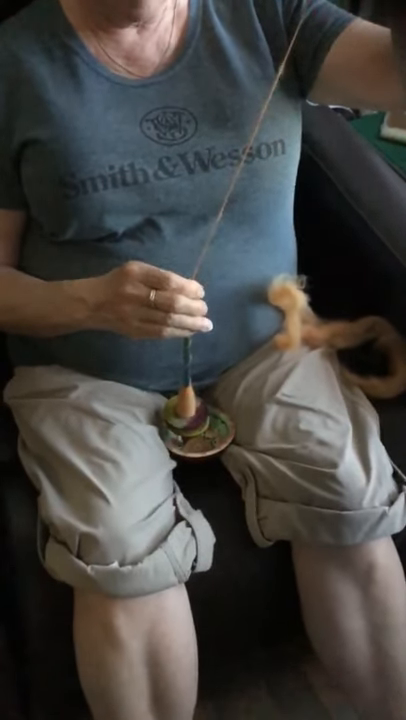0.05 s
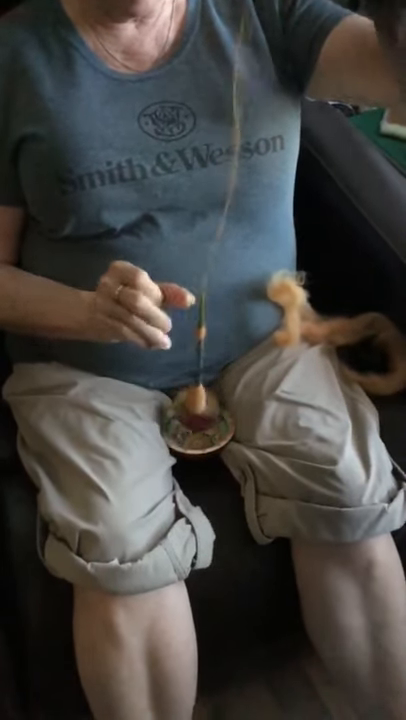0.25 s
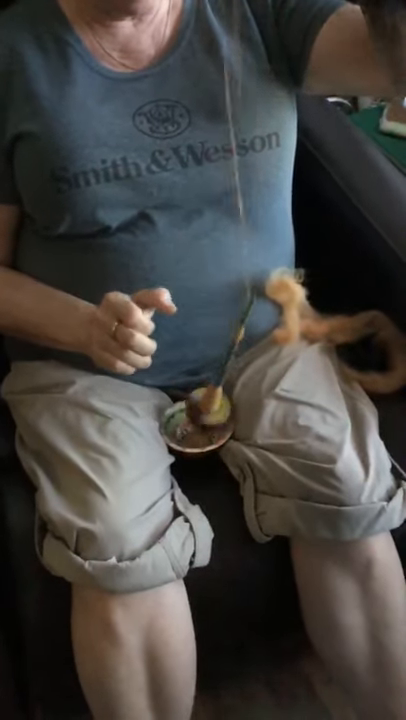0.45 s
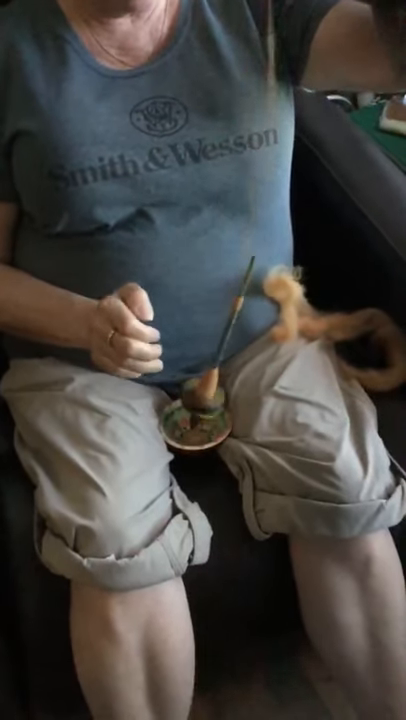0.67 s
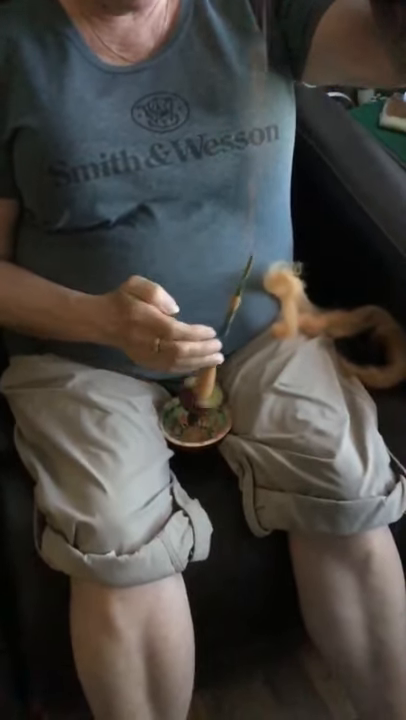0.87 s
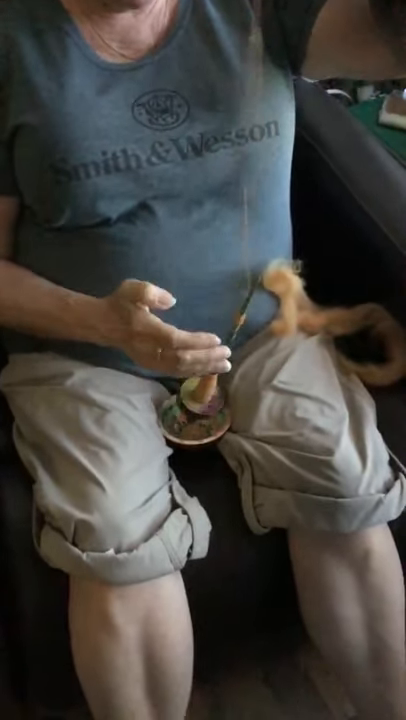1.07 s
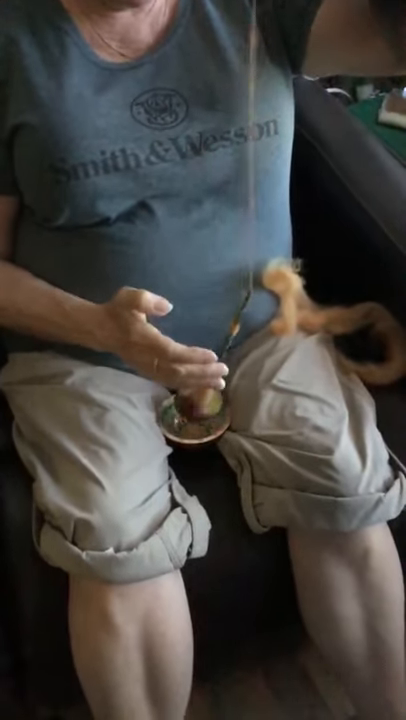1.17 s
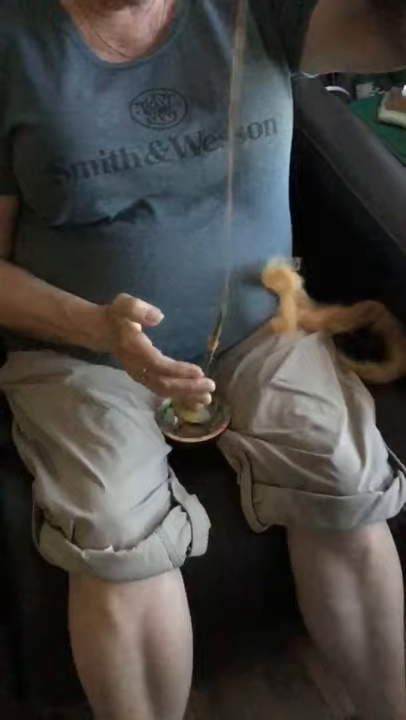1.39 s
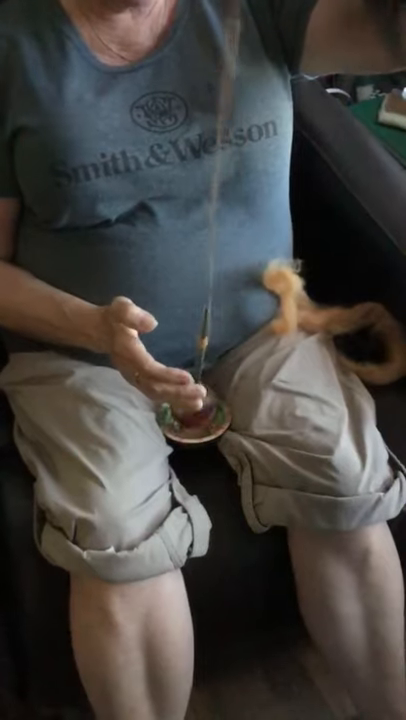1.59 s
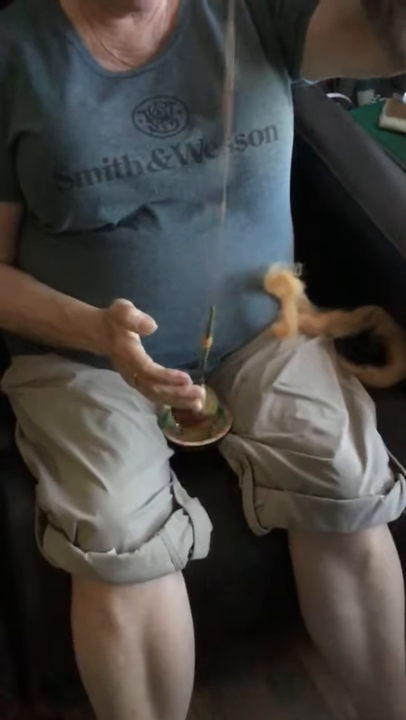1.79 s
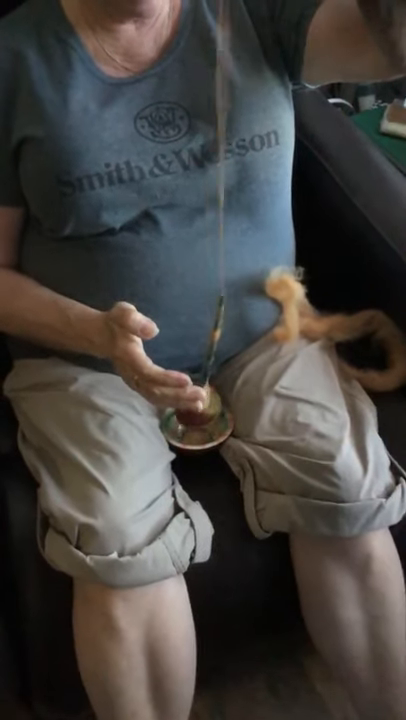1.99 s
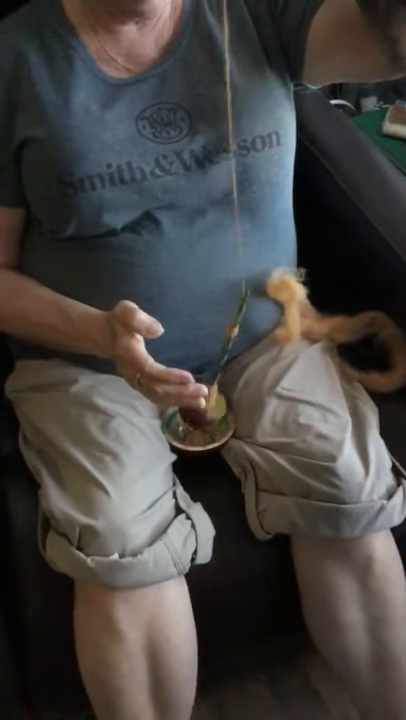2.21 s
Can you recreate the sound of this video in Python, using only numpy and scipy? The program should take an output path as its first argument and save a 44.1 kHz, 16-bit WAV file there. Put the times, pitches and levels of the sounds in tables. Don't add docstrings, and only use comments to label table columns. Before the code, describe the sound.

A wooden spindle spins in a small dish with a rough, rattling scrape that dies away

```python
import sys
import numpy as np
from scipy import signal
from scipy.fft import rfft, irfft, next_fast_len
from scipy.io import wavfile
from scipy.ndimage import uniform_filter1d, map_coordinates

SR = 44100
rng = np.random.default_rng(int(sys.argv[2]) if len(sys.argv) > 2 else 0)


def how_loud(loudness_db):
    steps = np.asarray(loudness_db, float) / 20
    return 10 ** steps


def unload_audio(sound):
    columns = np.transpose(np.atleast_2d(sound))
    steps = np.round(np.clip(columns, -1, 1) * 32767)
    wavfile.write(sys.argv[1], SR, steps.astype(np.int16))


N = 99225

# [t/s, peak level/dB, click f/Hz, spray level/dB]
HOPS = [(0.2314, -51.5, 5530, -12), (0.241, -63, 5590, -3), (0.2544, -37, 5300, 12),
        (0.2691, -32.5, 6470, 2), (0.2984, -33, 6300, 3), (0.312, -32, 6460, 17), (0.3575, -34, 6950, -11),
        (0.375, -31, 6140, -22), (0.4199, -28.5, 6340, -6), (0.4394, -30.5, 5500, 10),
        (0.4722, -31.5, 5150, -11), (0.4807, -36, 7140, -11), (0.5013, -36, 6900, -11),
        (0.5234, -44, 5580, 3), (0.53, -37.5, 5560, -8), (0.5483, -48, 4500, -6), (0.5475, -30, 5330, -11),
        (0.566, -30.5, 6640, -6), (0.5998, -39, 6160, -4), (0.6132, -54, 6730, -6), (0.6264, -55, 4890, -9),
        (0.6584, -70, 5450, -6), (0.675, -62, 6170, -6), (0.679, -58, 5400, -6), (0.6957, -44, 5970, -2),
        (0.7185, -33, 6050, 12), (0.7732, -39, 5400, 3), (0.8014, -45, 4540, -4),
        (0.8004, -34.5, 5440, -12), (0.8276, -42, 5230, -10), (0.8333, -29, 5700, -26),
        (0.899, -55, 5540, -6), (0.9611, -35.5, 6000, 8), (0.9943, -40, 6500, -1), (1.0462, -50, 6150, -6),
        (1.0518, -54, 5500, -18.5), (1.0639, -40, 5530, -8), (1.1047, -49, 5860, -10),
        (1.1117, -50, 5440, -6), (1.167, -39, 5800, -18), (1.2688, -57, 5470, -6),
        (1.3821, -45.5, 5540, -11)]
# [t/s, peak level/dB, f/Hz, contact t/s]
ROCKS = [(1.051, -38, 1170, 0.0095), (1.105, -35.5, 1123, 0.011), (1.169, -38.5, 805, 0.015),
         (1.236, -40, 1220, 0.0062), (1.271, -35.5, 805, 0.0078), (1.306, -44, 1075, 0.013),
         (1.369, -44.5, 1160, 0.0081), (1.383, -49.5, 1190, 0.0023), (1.04, -50, 2440, 0.011),
         (1.27, -53, 2320, 0.0052), (1.45, -49, 1360, 0.011), (1.474, -52.5, 1286, 0.006),
         (1.581, -45, 1090, 0.0028), (1.665, -48, 1190, 0.0028), (1.732, -53.5, 815, 0.011),
         (1.838, -51, 847, 0.0071), (1.948, -65, 635, 0.012), (2.025, -55, 885, 0.008),
         (2.153, -67, 674, 0.011), (2.211, -62, 890, 0.011)]
# [t/s, peak level/dB, f/Hz, contact t/s]
FLICKS = [
    (0.214, -47.5, 1580, 0.0089),
    (0.2251, -43.5, 1716, 0.015),
    (0.236, -42.5, 1448, 0.034),
    (1.4491, -58.5, 1714, 0.026),
]
# [f/Hz, width f/Hz, level/dB]
SHAFT_MODES = [(590, 34, -6.5), (673, 42, -6), (788.5, 24, -2.5), (932, 52, -7.5), (1068, 42.5, -1),
               (1190, 64, 1.5), (1309, 46.6, 1), (1426, 34.4, 0), (1580, 255, -7), (1876, 154, -9.5),
               (2328, 280, -13)]
# [f/Hz, width f/Hz, level/dB]
DISH_MODES = [(3270, 186, 6.5), (3594, 290, 0), (3892, 73, 5.5), (5440, 430, -6), (6500, 300, -3.5),
              (6950, 100, -6), (8380, 190, -11), (10180, 260, -16.5), (12400, 380, -11.5),
              (14400, 1800, -20)]
# [f/Hz, width f/Hz, level/dB]
BOWL_MODES = [(805, 58, -2.5), (1106, 80, -3), (1213.3, 56, 2), (1643, 36, -12)]
# [t/s, level/dB, upper modes over lower level/dB]
PRESSURE = [(0.226, -63.5, 5), (0.253, -42, 7.5), (0.309, -39.5, 2.5), (0.325, -35, 4), (0.414, -48, -3),
            (0.421, -39, 0), (0.463, -46.5, 0.5), (0.609, -40.5, 3.5), (0.753, -46, 2), (0.866, -41, 4),
            (1.001, -48.5, 6.5), (1.015, -45, 14), (1.267, -50, 10), (1.272, -60.5, 31), (1.359, -57.5, -6),
            (1.385, -46.5, 6), (1.427, -80, 4), (1.451, -61, 16)]
# [t/s, level/dB]
SLIDING = [(.21, -94), (0.242, -66.5), (.3, -52), (.4, -63), (.45, -65.5), (.58, -54), (.65, -65.5),
           (.74, -57), (.8, -54.5), (.87, -64), (.93, -69.5), (.97, -73), (1.06, -64.5), (1.14, -65.5),
           (1.2, -94), (1.27, -74), (1.35, -83), (1.45, -85)]
# [t/s, level/dB, half length t/s]
LIFTS = [
    (0.405, -2.5, .008),
    (0.472, 2, .005),
    (0.557, -5, .004),
    (0.76, -5.5, 0.0052),
    (.795, 0, 0.0044),
    (1.229, -16, 0.0067),
    (1.3, -6, .008),
    (1.35, -7, .012),
]
# [t/s, peak level/dB, contact t/s]
SCRAPES = [(0.227, -60, 0.011), (0.2433, -47, 0.0035), (0.254, -36, 0.0039), (0.2735, -34, 0.01),
           (0.294, -33, 0.0095), (0.347, -42, 0.006), (0.3565, -42, 0.006), (0.3745, -36.5, 0.0046),
           (0.4172, -55, 0.0073), (0.4385, -33, 0.006), (0.4746, -35.5, 0.0089), (0.5237, -52, 0.0048),
           (0.5465, -26, 0.004), (0.5673, -31, 0.0037), (0.6, -36, 0.0081), (0.617, -36.5, 0.0094),
           (0.6823, -38, 0.0042), (0.7173, -35, 0.0053), (0.7535, -46, 0.011), (0.7757, -31, 0.006),
           (0.8, -33, 0.0045), (0.832, -40, 0.0085), (0.8494, -31, 0.0063), (0.8754, -37, 0.005),
           (0.917, -46, 0.0055), (0.952, -46, 0.0038), (0.99, -47, 0.0052), (1.054, -42, 0.006),
           (1.109, -42, 0.0037), (1.1667, -53, 0.006), (1.179, -46, 0.0049), (1.2335, -68, 0.0053),
           (1.262, -49.5, 0.0065), (1.312, -50.5, 0.0052), (1.3657, -70, 0.0034), (1.3836, -42, 0.0036),
           (1.4111, -75, 0.0041)]
# [f/Hz, level/dB, wander rate/(1/s)]
SINGING_MODES = [(3285, -1.5, 110), (3403, -4, 140), (3896, -16.5, 40)]
# [t/s, peak level/dB]
JOLTS = [(0.24, -39.5), (0.256, -33), (0.273, -24), (0.323, -27), (0.42, -33), (0.473, -29), (0.72, -37),
         (0.775, -35), (0.8, -33), (0.845, -27), (0.864, -23), (0.947, -44), (1.012, -42)]
# [f/Hz, level/dB per Hz]
ROOM_AIR = [(50, -34), (85, -5), (266, -7.5), (301, -4.5), (419, -16.5), (979, -18), (1420, -21),
            (12000, -34), (15600, -29), (22000, -120)]
# [f/Hz, T60 t/s]
WALL_DECAY = [(500, 0.35), (3000, 0.22), (10000, 0.33)]
# [f/Hz, level/dB]
MICROPHONE = [(20, -42), (45, -2), (70, 0), (11500, -0.5), (13000, -13), (15800, -9)]

GRIT_PER_S, GRIT_SPREAD_DB, GRIT_HISS, GRIT_TOP_DB = 900, 3, 0.92, 11
SLIDE_PER_S, SLIDE_SPREAD_DB, SLIDE_HISS = 420, 3.6, 0.22
PRESS_DB, SLIDE_DB, WOBBLE_DB, SING_DB = -3.5, 2.5, 5.5, -3.5
STEADY_S = 0.027
SETTLE_S, SETTLE_OVER_S, BOWL_EARLY_DB, BOWL_LATE_DB = 0.867, 0.14, -20, 5
FLIGHT_S, FLIGHT_DB, LANDED_S, LANDED_DB, BITE_TOP_DB = 0.0027, -1, 0.0047, 6, 7
ROCK_RISE_S, ROCK_T60_S, ROCK_DB, ROCK_SCUFF_DB = 0.002, 0.035, -8, -5
SCRAPE_RISE_S, SCRAPE_T60_S, SCRAPE_DB = 0.00067, 0.026, -8.5
CLICK_RISE_S, CLICK_T60_S, CLICK_WIDTH_HZ, CLICK_DB = 0.0009, 0.012, 1000, -3
CRACK_DB, RING_DB, KNOCK_DB, CHATTER_S = -24, -7.5, -9, 0.0006
AIR_DB, WALLS_DB, LOW_CUT_HZ = -62.5, -6.5, 395
DRONE_HZ, DRONE_SWAY_DB, DRONE_DB = 68, 1.3, -68
HUM_HZ, HUM_FROM_S, HUM_RISE_S, HUM_DB = 304, 2.14, 0.09, -60
BRUSH_S, BRUSH_T60_S, BRUSH_DB, BRUSH_HZ, BRUSH_WIDTH_HZ = 2.147, 0.17, -67, 4660, 2800


def unit(x):
    return x / np.sqrt(np.mean(x ** 2) + 1e-20)


def along(points, hz):
    f, value = np.transpose(points)
    return np.interp(np.log(hz + 1), np.log(f + 1), value)


def wobble(rate):
    knots = rng.standard_normal(int(N * rate / SR) + 4)
    return map_coordinates(knots, [np.arange(N) * rate / SR])


def filtered(x, response):
    m = next_fast_len(N + SR // 2)
    return irfft(rfft(x, m) * response(np.fft.rfftfreq(m, 1 / SR)), m)[..., :N]


def body(x, modes):
    def response(f):
        return sum((-1) ** k * how_loud(db) * 1j * f * width / (hz * hz - f * f + 1j * f * width)
                   for k, (hz, width, db) in enumerate(modes))
    return filtered(x, response)


def steep(x, hz, width):
    mode = [(hz, width, 0)]
    return body(body(x, mode), mode)


def steady(x):
    power = np.abs(uniform_filter1d(x ** 2, round(STEADY_S * SR)))
    return x / np.sqrt(power + 1e-12)


def contact_shape(t, db, hold, rise, t60):
    return how_loud(db - 60 * np.clip(t - hold, 0, 1) / t60) * (1 - np.exp(-t / rise))


def room():
    t = np.arange(N) / SR
    spectrum = [(20, 3), (70, -17.5)] + list(ROOM_AIR[1:-2])
    air = unit(filtered(rng.standard_normal(N), lambda f: how_loud(along(spectrum, f))))
    air = air * how_loud(AIR_DB + 0.41 * wobble(6.2))
    drone = np.sqrt(2) * np.sin(2 * np.pi * DRONE_HZ * t + 0.38 * wobble(7.7))
    drone = drone * how_loud(DRONE_DB + DRONE_SWAY_DB * wobble(9.7))
    hum_rise = np.clip((t - HUM_FROM_S) / HUM_RISE_S, 0, 1)
    hum = how_loud(HUM_DB) * hum_rise * np.sin(2 * np.pi * HUM_HZ * t)
    after = np.clip(t - BRUSH_S, 0, 1)
    brush = unit(steep(rng.standard_normal(N), BRUSH_HZ, BRUSH_WIDTH_HZ))
    brush = brush * contact_shape(after, BRUSH_DB, 0, 0.002, BRUSH_T60_S)
    return air + drone + hum + brush


def grit(per_s, spread_db, hiss):
    chance, size_draw, sign_draw = rng.random((3, N))
    size_db = np.minimum(-spread_db * np.log(size_draw + 1e-9), GRIT_TOP_DB)
    impacts = how_loud(size_db) * np.sign(sign_draw - 0.5) * (chance < per_s / SR)
    return unit(impacts) + hiss * rng.standard_normal(N)


def bowl(x):
    return sum(how_loud(db) * steep(x, hz, width) for hz, width, db in BOWL_MODES)


def contact_db():
    since = np.arange(N) / SR - np.transpose(HOPS)[0][:, None]
    before = FLIGHT_DB * (since < 0) * np.exp(np.clip(since, -1, 0) / FLIGHT_S)
    after = LANDED_DB * (since >= 0) * np.exp(-np.clip(since, 0, 1) / LANDED_S)
    return np.minimum((before + after).sum(axis=0), BITE_TOP_DB)


def lift_db():
    t = np.arange(N) / SR
    return sum(db * np.exp(-((t - s) / half) ** 2) for s, db, half in LIFTS)


def grinding():
    t = np.arange(N) / SR
    s, press_db, upper_db = np.transpose(PRESSURE)
    rub = grit(GRIT_PER_S, GRIT_SPREAD_DB, GRIT_HISS)
    lower = body(rub, SHAFT_MODES[:6])
    upper = how_loud(np.interp(t, s, upper_db)) * body(rub, SHAFT_MODES[6:])
    settled_db = np.interp(t, [SETTLE_S, SETTLE_S + SETTLE_OVER_S], [BOWL_EARLY_DB, BOWL_LATE_DB])
    shaft = steady(unit(lower + upper) + how_loud(settled_db) * unit(bowl(rub)))
    bite_db = contact_db()
    shaft = shaft * how_loud(np.interp(t, s, press_db, -120, -120) + PRESS_DB + 0.5 * bite_db)

    s, slide_db = np.transpose(SLIDING)
    slide_db = np.interp(t, s, slide_db, -120, -120) + SLIDE_DB
    slide = how_loud(slide_db + bite_db + WOBBLE_DB * wobble(43.83))
    ticks = grit(SLIDE_PER_S, SLIDE_SPREAD_DB, SLIDE_HISS)
    dish = body(ticks * slide, DISH_MODES) / np.std(body(ticks, DISH_MODES))
    sing = how_loud(SING_DB) * steady(body(rng.standard_normal(N), DISH_MODES[:3]))
    return how_loud(lift_db()) * (shaft + dish + sing * slide)


def rocks():
    tone, scuff, t = np.zeros(N + SR), np.zeros(N + SR), np.arange(5000) / SR
    for s, db, hz, hold in list(FLICKS) + list(ROCKS):
        start = round(s * SR)
        shape = contact_shape(t, db + ROCK_DB, hold, ROCK_RISE_S, ROCK_T60_S)
        phase_drift = 0.39 * np.cumsum(rng.standard_normal(5000)) / 20
        tone[start:][:5000] += shape * np.sin(2 * np.pi * hz * t + phase_drift)
        scuff[start:][:5000] += shape
    rub = uniform_filter1d(rng.standard_normal(N), size=12)
    scuffing = body(rub * scuff[:N], SHAFT_MODES) / np.std(body(rub, SHAFT_MODES))
    return tone[:N] + how_loud(ROCK_SCUFF_DB) * scuffing


def scrapes():
    drag, t = np.zeros(N + SR), np.arange(5000) / SR
    for s, db, hold in SCRAPES:
        shape = contact_shape(t, db + SCRAPE_DB, hold, SCRAPE_RISE_S, SCRAPE_T60_S)
        drag[round(s * SR):][:5000] += shape
    t, singing = np.arange(N) / SR, np.zeros(N)
    for hz, db, rate in SINGING_MODES:
        size = how_loud(db + 2.0 * wobble(rate) + 2.7 * wobble(24.9))
        singing += size * np.sin(2 * np.pi * hz * t + 1.58 * wobble(rate))
    return drag[:N] * singing


def struck(rows, modes):
    blows, impulse, t = np.zeros(N + 400), np.zeros(N), np.arange(400) / SR
    impulse[0] = 1
    for s, db in rows:
        chatter = np.exp(-t / CHATTER_S) * (rng.standard_normal(400) ** 3 + 12 * (t == 0))
        blows[round(s * SR):][:400] += how_loud(db) * chatter / np.linalg.norm(chatter)
    return body(blows[:N], modes) / np.abs(body(impulse, modes)).max()


def hops():
    out, t, f = np.zeros(N + SR), np.arange(2048) / SR, np.fft.rfftfreq(2048, 1 / SR)
    shape = contact_shape(t, 0, 0, CLICK_RISE_S, CLICK_T60_S)
    for s, db, hz, spray_db in HOPS:
        peak = 1 / np.hypot(1, (f * f - hz * hz) / (f + 1) / CLICK_WIDTH_HZ)
        spray = how_loud(spray_db + CRACK_DB) * (f > hz) * hz / (f + 1)
        click = shape * irfft(rfft(rng.standard_normal(2048)) * (peak + spray))
        click = click / np.linalg.norm(click) * np.linalg.norm(shape)
        out[round(s * SR):][:2048] += how_loud(db + CLICK_DB) * click
    ring = struck([(s, db + RING_DB) for s, db, _, _ in HOPS], DISH_MODES)
    knock = struck([(s, db + KNOCK_DB) for s, db in JOLTS], SHAFT_MODES)
    return out[:N] + ring + knock


def walls(x):
    hz, t, z = signal.stft(rng.standard_normal(SR // 2), SR, nperseg=256)
    decay = how_loud(-60 * t / along(WALL_DECAY, hz)[:, None])
    tail = signal.istft(z * decay, SR, nperseg=256)[1]
    delayed = np.pad(x, (200, 0))
    return signal.fftconvolve(delayed, tail / np.linalg.norm(tail))[:N]


def scene():
    spindle = grinding() + hops() + scrapes() + rocks()
    low_cut = signal.butter(6, LOW_CUT_HZ, "high", fs=SR, output="sos")
    spindle = signal.sosfilt(low_cut, spindle)
    return (spindle + how_loud(WALLS_DB) * walls(spindle) + room())[None]


def roll_off(x):
    return signal.sosfilt(signal.butter(12, 15850, fs=SR, output="sos"), x)


def record(dry):
    mix = filtered(dry, lambda f: how_loud(along(MICROPHONE, f)))
    return roll_off(mix)


dry = scene()
out = record(dry)
unload_audio(out)
```